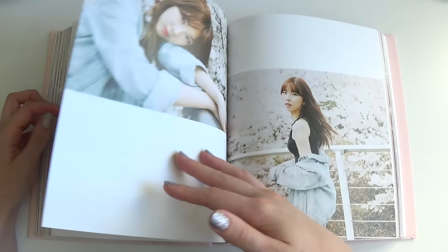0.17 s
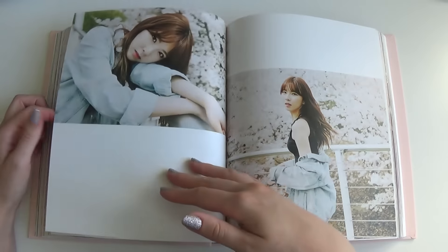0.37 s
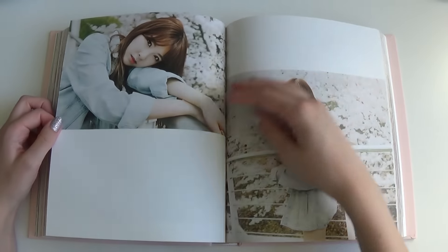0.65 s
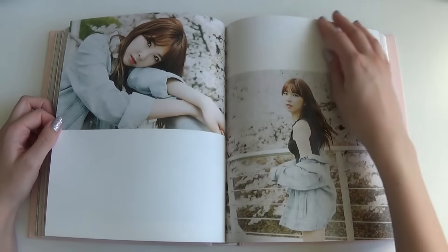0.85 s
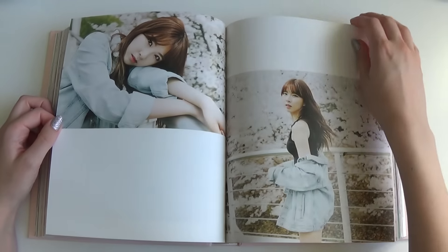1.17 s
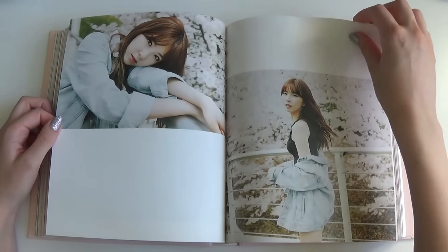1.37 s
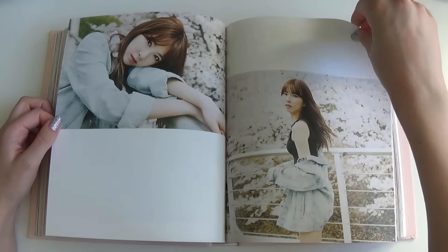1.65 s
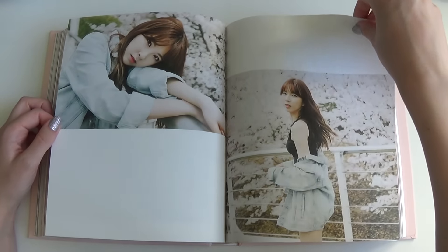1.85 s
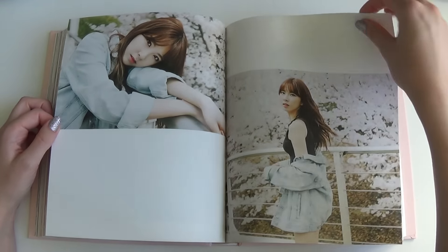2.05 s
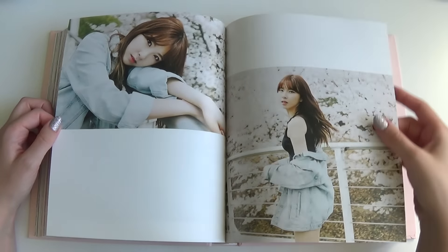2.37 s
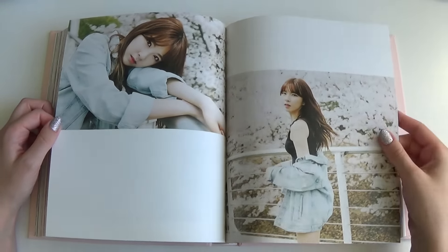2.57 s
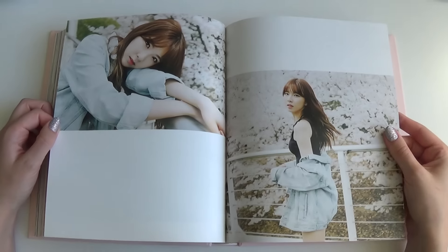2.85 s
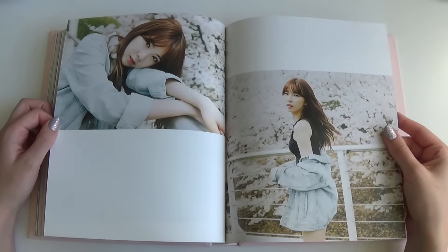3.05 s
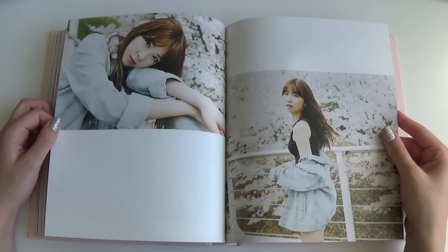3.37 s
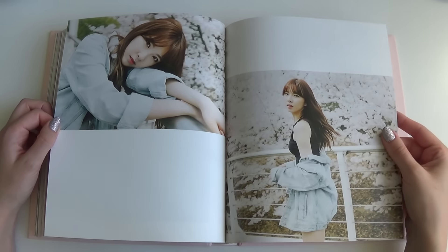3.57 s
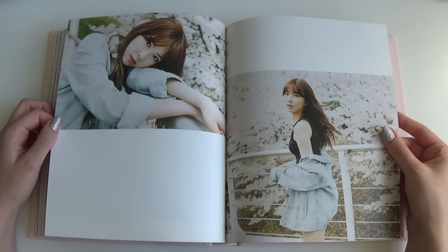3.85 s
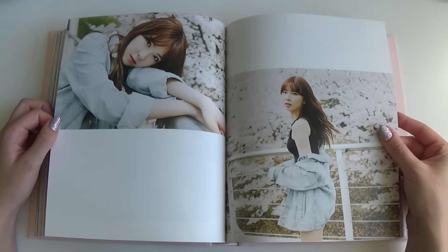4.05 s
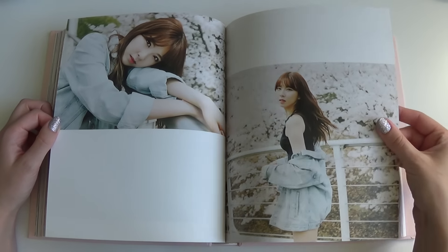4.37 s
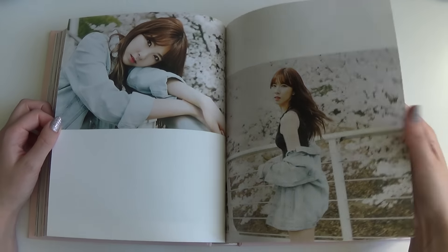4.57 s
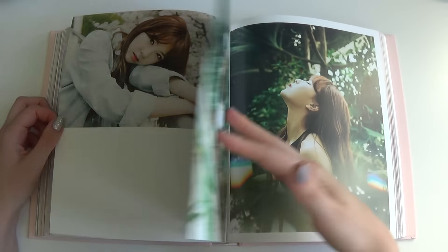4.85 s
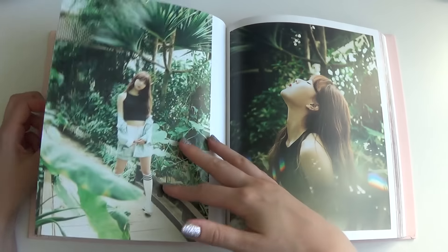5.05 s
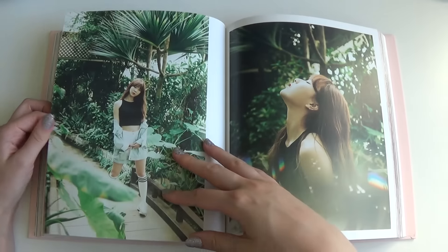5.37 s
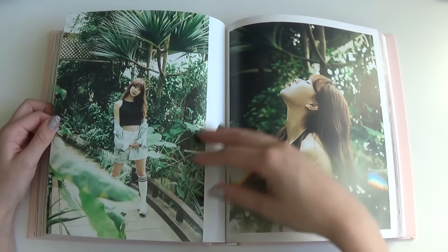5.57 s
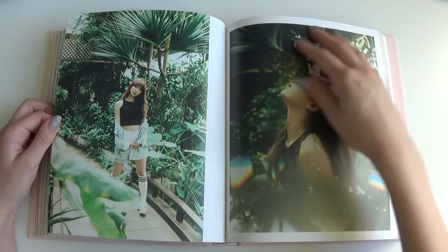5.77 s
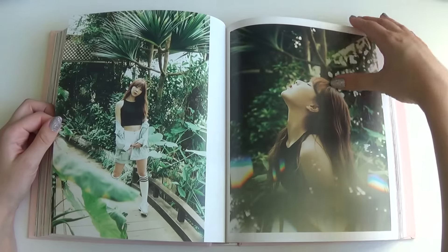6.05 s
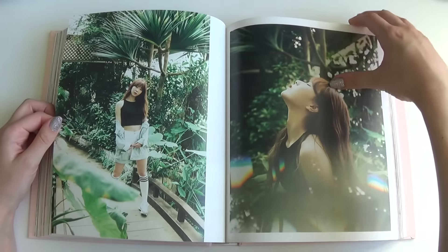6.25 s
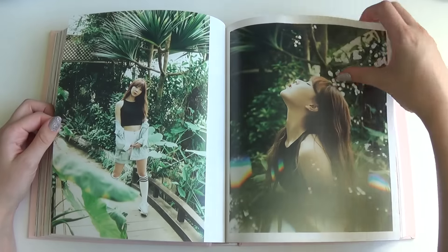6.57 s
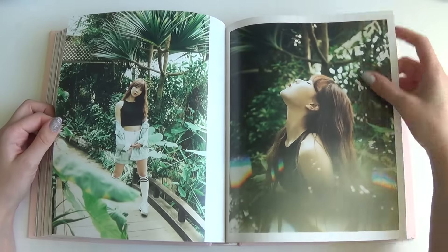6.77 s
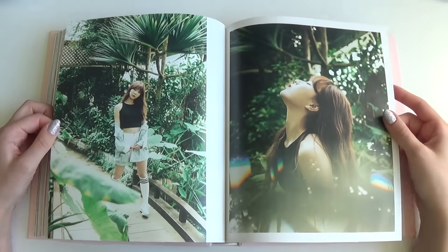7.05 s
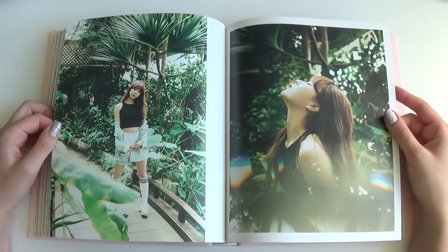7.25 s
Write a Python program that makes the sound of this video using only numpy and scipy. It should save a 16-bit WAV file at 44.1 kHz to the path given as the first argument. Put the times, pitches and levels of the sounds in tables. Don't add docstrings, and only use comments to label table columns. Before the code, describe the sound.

Close stereo pickup of a large glossy book in a quiet, barely reverberant room. A steady soft hiss with low rumble, a faint very high whine and tiny rapid lens-motor ticks continue throughout. From 0 to 1.2 s a palm slides over coated paper in silky, high airy strokes, strongest near 0.75. At 1.4 to 2.5 s fingers and nails scrape the page edge, brighter and rougher, with whistling friction, creaks and a hard pop at 2.0. It calms from 2.7, with sparse fibre ticks; at 3.66 to 4.0 a thumb makes a fine dry crackle. Sharp snaps burst at 4.18 to 4.41, then creaks and pops near 4.55 as the sheet turns with a rustle, settling around 5.0 with small clicks. Smooth strokes and a dull slap come at 5.5 to 6.0. A sharp click, rasp and low slap peak at 6.7, fading into light rubbing and small taps until 7.4.

```python
import sys
import numpy as np
from scipy import signal
from scipy.fft import rfft, irfft, next_fast_len
from scipy.io import wavfile
from scipy.ndimage import uniform_filter1d, map_coordinates

SR = 44100
rng = np.random.default_rng(int(sys.argv[2]) if len(sys.argv) > 2 else 0)


def ratio_of_db(decibels):
    return 10 ** (np.asarray(decibels, float) / 20)


def output_pcm(signal):
    pcm = np.clip(np.atleast_2d(signal).T, -1, 1) * 32767
    wavfile.write(sys.argv[1], SR, np.round(pcm).astype(np.int16))


N = 326937

# peak_s, level_db, swell_s, fade_s
HAND_GLIDES = [
    (0, -55, 0.011, 0.17),
    (.65, -50, 0.23, 0.23),
    (.75, -45.5, 0.06, 0.13),
    (.855, -50, .08, 0.22),
    (1.0, -53.5, 0.56, 0.11),
    (4.805, -51.5, 0.0043, .4),
    (4.95, -47, 0.12, 0.11),
    (5.778, -45, 0.21, 0.22),
    (6.0, -57, .3, 0.082),
]
# peak_s, level_db, swell_s, fade_s
FINGER_BRUSHES = [(.31, -60, 0.24, 0.056), (.568, -48, 0.045, 0.061), (1.705, -55, .005, 0.07),
                  (2.265, -49, 0.18, 0.022), (2.326, -46.5, 0.0031, 0.12), (2.44, -49, 0.13, 0.058),
                  (2.695, -52, .03, .03), (4.7, -54.5, 0.24, 0.061), (5.209, -56.5, 0.34, 0.13),
                  (5.59, -53, 0.13, .06), (6.296, -50.5, .004, 0.013), (6.551, -52.5, .005, 0.24),
                  (6.87, -45.5, 0.31, 0.2), (7.117, -53.5, 0.004, 0.057), (7.223, -52.5, 0.0044, 0.027),
                  (7.249, -54, .004, .02), (2.402, -51, .004, .1), (4.602, -54, .004, 0.18),
                  (5.482, -53, .006, .01), (6.63, -51, .006, .2), (6.695, -42, .01, .1)]
# peak_s, level_db, swell_s, fade_s
NAIL_SCRAPES = [(.31, -56, 0.28, 0.073), (1.142, -53.5, 0.069, 0.22), (1.47, -48.5, 0.062, 0.041),
                (1.748, -34, 0.015, 0.079), (1.9, -45, 0.17, .08), (1.987, -52, 0.009, 0.11),
                (2.075, -42, 0.0064, 0.19), (2.18, -35, 0.11, 0.02), (2.2, -46.5, .02, .1),
                (2.44, -45, 0.056, 0.19), (2.695, -47.5, 0.047, 0.046), (4.42, -57, .01, 0.079),
                (4.487, -52, 0.0051, 0.31), (4.992, -48, 0.12, 0.08), (5.476, -57.5, .02, 0.26),
                (6.59, -43, 0.046, 0.024), (6.707, -43.5, 0.15, 0.33), (7.03, -46.5, 0.51, 0.071)]
# peak_s, level_db, swell_s, fade_s
EDGE_DRAGS = [(.124, -58.5, 0.5, 0.84), (.55, -61, .25, 0.17), (1.0, -51.5, 0.73, 0.25),
              (1.2, -59, 0.6, 0.81), (1.433, -47, 0.005, 0.11), (1.766, -34, 0.035, 0.19),
              (1.89, -37, 0.17, 0.093), (1.987, -37.5, 0.0089, 0.047), (2.18, -40.5, 0.12, 0.03),
              (2.326, -51.5, .005, 0.099), (2.44, -50, 0.035, 0.18), (2.695, -49.5, 0.14, 0.05),
              (2.76, -57.5, .1, 0.54), (3.475, -62, .005, .16), (3.75, -62.5, 0.12, 0.97),
              (4.042, -57, .005, 0.17), (4.551, -49.5, 0.22, 0.29), (4.7, -53, 0.27, 0.026),
              (4.803, -53, 0.0045, 0.17), (4.999, -49.5, 0.086, 0.092), (5.209, -50.5, 0.43, 0.15),
              (5.48, -60.5, .02, 0.57), (5.778, -56, 0.18, 0.58), (6.523, -50, .004, .1),
              (6.551, -45.5, 0.01, 0.2), (6.585, -43, .006, .04), (6.635, -47, .01, .2),
              (6.707, -38.5, 0.059, 0.18), (7.06, -48, 0.61, 0.11)]
# skin_db, gloss_db, nail_db, edge_db
STROKE_MIX = [(0, -2.5, -8, -12), (-0.5, -7.5, -10, -19), (-4.5, -17, -0.5, -5), (-17.5, -28, -21, -1)]
# peak_s, level_db, swell_s, fade_s, resonance_hz
BENDS = [(.3, -59.5, 0.27, 0.53, 1480), (.55, -61.5, 0.27, 0.25, 1500), (1.429, -51.5, .006, 0.11, 1150),
         (1.704, -48.5, .004, 0.056, 1500), (1.89, -47, 0.21, 0.19, 1780), (2.036, -39, .015, 0.035, 900),
         (2.11, -47, .1, .1, 1750), (2.165, -41, 0.04, 0.06, 1550), (2.22, -49, .05, 0.11, 1450),
         (2.4, -56, .01, .08, 1050), (2.328, -50, 0.004, 0.13, 1010), (2.45, -47.5, 0.047, 0.3, 1290),
         (2.75, -59, 0.41, 0.16, 1200), (3.482, -67.5, .02, .6, 1130), (3.796, -68, 0.25, 1.2, 1320),
         (4.06, -63, .5, .3, 1440), (4.51, -46, .06, .1, 1150), (4.553, -41.5, 0.03, 0.05, 1030),
         (4.595, -43, .05, .08, 1020), (4.803, -61, 0.0017, 0.12, 864), (4.979, -55, 0.089, 1, 1470),
         (5.26, -53.5, 0.63, 0.035, 1330), (5.582, -56.5, 0.17, 0.06, 1200), (5.88, -66, 0.34, 1, 970),
         (6.7, -48, 0.24, .05, 884), (6.725, -46.5, .02, 0.17, 744), (7.06, -51.5, 0.26, 0.16, 1700)]
# peak_s, level_db, swell_s, fade_s
AIR_PUSHES = [(0, -61, .01, 0.12), (.726, -62, 0.16, 0.33), (2.036, -39.5, 0.015, 0.08),
              (2.27, -53, 0.073, 0.12), (.3, -63.5, 0.11, 0.11), (4.185, -51, .01, .06),
              (4.265, -50, .01, 0.074), (2.756, -60.5, 0.28, 0.33), (3.796, -56.5, 0.21, 0.46),
              (4.558, -51, 0.26, 0.18), (4.803, -52.5, .005, 0.26), (5.269, -61, 0.71, 0.074),
              (5.582, -55.5, 0.18, 0.066), (5.88, -58.5, 0.34, 0.28), (6.6, -56, 0.17, 0.19),
              (6.723, -40, 0.008, 0.06), (4.85, -54, .06, .12), (6.56, -54, .02, .08)]
# peak_s, level_db, swell_s, fade_s, pitch_hz
AIR_WHISTLES = [(.567, -44, .015, .012, 6200), (.755, -57, .04, .08, 5700), (.76, -55, 0.056, 0.27, 3050),
                (.86, -49, 0.22, .2, 11600), (.87, -56, 0.11, 0.089, 4700), (1.03, -56, 0.26, .08, 3100),
                (1.79, -45, 0.054, .08, 3170), (1.88, -39.5, .15, 0.13, 2340), (1.87, -50, .1, .12, 7100),
                (1.87, -50, .1, .1, 4150), (2.01, -47, .03, .05, 5100), (2.09, -40, .03, 0.094, 5000),
                (2.41, -51, .012, .08, 6700), (4.59, -55, .12, .015, 8400), (4.19, -54, .006, .08, 5300),
                (4.27, -50, .006, .08, 5000), (4.41, -52, .012, .07, 5200), (2.13, -46, .08, .06, 4200),
                (2.165, -47, .04, .03, 5200), (1.765, -45, .02, .06, 6500), (4.99, -45, .015, .025, 4300),
                (5.125, -50, .03, .06, 1450), (.16, -59, .1, .06, 3100), (6.59, -45, .012, .012, 2500),
                (5.78, -44, .1, .12, 12200), (5.95, -58, .15, .15, 11200), (6.56, -52, 0.044, .06, 1880),
                (6.93, -47, .12, .1, 4960), (6.93, -53, .15, 0.18, 3150), (7.03, -47, .1, .08, 4900),
                (7.06, -52, .08, 0.072, 2000)]
STROKE_DB = 20
ROUND_SKIN, ROUND_PAPER, ROUND_BEND = 1.33, 1.226, 1.15

# start_s, peak_db, ring_hz, crack_db
SNAPS = [(1.703, -41, 1420, -15), (2.034, -32, 950, -25), (4.1772, -36, 1300, -12), (3.242, -47.5, 940, 7),
         (3.927, -45, 1050, 4), (4.044, -36.5, 1320, -3), (4.184, -23.5, 1310, -2),
         (4.263, -14, 1240, -6.5), (4.358, -34, 1080, -12), (4.366, -15, 1130, -8),
         (4.398, -19, 1270, -8.5), (4.408, -24.5, 1370, -6.5), (5.587, -34.5, 1380, 1.5),
         (7.117, -40, 1480, -1)]
# start_s, peak_db, ring_hz, crack_db
POPS = [(.408, -37, 1400, -14), (1.984, -13.5, 2660, -39), (2.071, -21.5, 4100, -26),
        (2.326, -34.5, 990, -17), (4.549, -19.5, 984, -15.5), (4.578, -28, 1160, -24),
        (4.601, -26.5, 990, -7), (4.802, -46, 980, 7), (4.985, -27, 1670, -10), (4.992, -26, 1390, -8),
        (6.654, -34, 2360, 3), (6.733, -27, 700, -20), (6.761, -35, 780, -20), (6.78, -37, 740, -20)]
# start_s, peak_db, ring_hz, crack_db
SLAPS = [
    (5.563, -36, 1270, -1.5),
    (6.295, -42.5, 800, 0),
    (6.551, -37, 1820, 0),
    (6.74, -30, 780, -12),
    (7.223, -41.5, 2500, -1.5),
]
# start_s, peak_db, ring_hz, crack_db
SLIPS = [(5.9, -34, 4600, -4), (6.7108, -16, 2180, -16), (7.2477, -42.5, 2500, 3.5), (4.9, -36, 1900, 3),
         (7.231, -45, 700, -8), (6.719, -13, 740, -6), (6.7195, -22, 3200, -30), (5.2, -28, 2500, 3),
         (.184, -44, 2600, -6), (6.584, -34, 5500, 0), (1.985, -23, 2000, -30), (3.679, -41, 1700, 0),
         (4, -36.5, 1900, -5), (4.018, -38, 1800, -5), (3.909, -36, 1700, -6)]
# thump_db, settle_s (time to fall 60 dB)
SETTLING = [(-19, 0.12), (-36, 0.15), (-13, 0.15), (-41, 0.02)]
# start_s, peak_db
FIBRE_TICKS = [(0.323, -38), (1.163, -40), (1.686, -38), (2.843, -39), (3.063, -43), (3.099, -42),
               (3.475, -41), (3.491, -41), (3.507, -40), (3.521, -41), (3.526, -41), (3.579, -40),
               (3.564, -43), (3.641, -40), (3.968, -35.5), (4.873, -33), (5.171, -38), (5.411, -39),
               (5.481, -38), (5.525, -35), (5.546, -35), (6.523, -39), (7.095, -37), (7.121, -38),
               (6.629, -36)]
# start_s, peak_db
THUMB_SLIPS = [(3.6613, -38), (3.697, -40), (3.7018, -34), (3.7088, -42), (3.7123, -39), (3.7215, -40),
               (3.7273, -36), (3.7338, -39), (3.7385, -37), (3.7494, -39), (3.7533, -37), (3.7693, -40),
               (3.7726, -34), (3.7888, -36), (3.7919, -33), (3.7954, -40), (3.8077, -33), (3.8132, -42),
               (3.8202, -38), (3.8234, -35), (3.8336, -43), (3.8405, -33), (3.8548, -32.5), (3.8632, -41),
               (3.8676, -36), (3.8764, -42), (3.8798, -34), (3.8915, -32), (3.8947, -41), (3.9166, -41),
               (3.9802, -37)]
BREAK_S = .0025
RING_SHARP, WHISTLE_SHARP = 3.66, 6.1

# pitch_hz, level_db
SKIN_COLOUR = [(200, -45), (4000, -15), (6000, -7.5), (8500, -3), (10200, 1), (11800, 1), (13500, -15),
               (15800, -20)]
# pitch_hz, level_db
GLOSS_COLOUR = [(200, -45), (9000, -18), (11500, -4), (13000, 0.5), (15000, -6), (15850, -6)]
# pitch_hz, level_db
NAIL_COLOUR = [(2800, -30), (3900, -9), (4500, -6), (5000, 0), (5600, -5), (7200, -9), (9000, -22),
               (15000, -45)]
# pitch_hz, level_db
EDGE_COLOUR = [(150, -55), (1000, -20.5), (1900, -4.5), (2400, -3), (3100, -2), (3800, -4.5), (6000, -14.5),
               (15000, -35)]
# pitch_hz, level_db
SHEET_COLOUR = [(350, -40), (600, -24), (900, -14), (1700, -14), (2300, -26), (4000, -46)]
# pitch_hz, level_db
AIR_COLOUR = [(40, -60), (90, -25), (170, 0), (350, -3), (600, 2), (1000, -18), (2000, -51)]
# pitch_hz, level_db
CRACK_COLOUR = [(300, -29.5), (800, -1), (1500, -1.5), (3000, -2), (4700, -1), (7500, -15), (11500, -10),
                (16000, -34.5)]
# pitch_hz, level_db
FIBRE_COLOUR = [(300, -27), (800, -1), (1600, 2.5), (3000, -4), (4500, -9), (7000, -16.5), (14000, -20.5)]

# first_step_s, last_step_s, level_db
FOCUS_RUNS = [
    (0.036, .75, -54),
    (0.757, 1.65, -51.5),
    (1.6775, 3.34, -52),
    (3.394, 4.4, -56.5),
    (4.4375, 5.5, -47.5),
    (5.5175, 7.41, -50),
]
# pitch_hz, level_db, decay_s (time to fall 60 dB)
LENS_RINGS = [(2440, -1, 0.039), (2670, 7, 0.016), (3150, -8, .007)]
# pitch_hz, level_db (per Hz)
HISS_COLOUR = [(20, -25), (40, 0), (70, -3), (98, 8.5), (125, -1), (200, 1.5), (300, -4), (500, -3),
               (1000, -5), (2000, -7.5), (4000, -10.5), (8000, -13), (12500, -15.5), (15300, -16.5)]
# pitch_hz, likeness (1 = the same)
HISS_LIKENESS = [(60, 0.82), (180, 0.94), (550, 0.33), (1650, 0.15), (4970, 0.69), (15000, 0.87)]
# pitch_hz, decay_s (time to fall 60 dB)
ROOM_DECAY = [(200, 0.19), (1000, 0.22), (4000, 0.13), (12000, 0.058)]
# time_s, left_minus_right_db
HAND_PLACE = [(0.0, 0), (1.86, -2), (2.97, -1), (4.722, -1.5), (4.87, -0.5), (5.22, 0.5), (6.69, -2),
              (7.41, -0.5)]
# pitch_hz, lead_radians
PORT_LEAD = [(0, 0), (340, 0.25), (1120, 0.55), (2410, 0.55), (4130, 0.33), (4480, 0.13), (6460, 0.39),
             (16500, 0.33)]
# pitch_hz, left_minus_right_db
PORT_LEAN = [(40, 2), (250, 5.5), (1000, 4), (2500, 1), (12000, 0.5)]
# pitch_hz, side_db
PORT_WIDTH = [(30, -10), (150, 0.5), (1000, 1.5), (5000, 0.5), (10000, -3.5), (14000, -5.5)]


def rubbing():
    kinds = [(HAND_GLIDES, ROUND_SKIN), (FINGER_BRUSHES, ROUND_SKIN),
             (NAIL_SCRAPES, ROUND_PAPER), (EDGE_DRAGS, ROUND_PAPER)]
    effort = [swells(rows, roundness).sum(0) for rows, roundness in kinds]
    powers = ratio_of_db(STROKE_MIX).T ** 2 @ effort
    skin, gloss, nail, edge = (sampled(np.sqrt(power)) for power in powers)
    skin = skin * friction(SKIN_COLOUR, grit_db=.8, patchy_db=1.3)
    gloss = gloss * friction(GLOSS_COLOUR, grit_db=.3, patchy_db=1.2)
    nail = nail * friction(NAIL_COLOUR, grit_db=1.5, patchy_db=3.5)
    edge = edge * friction(EDGE_COLOUR, grit_db=1.87, patchy_db=2.0)
    return skin + gloss + nail + edge


def creaks():
    bends = swells(BENDS, ROUND_BEND) + 1e-30
    sheet_hz = sampled(np.transpose(BENDS)[4] @ bends / bends.sum(0))
    rough = friction(SHEET_COLOUR, grit_db=2.5, patchy_db=0.0, centre_hz=sheet_hz, lift_db=7.5, width=.13)
    return sampled(np.sqrt(bends.sum(0))) * rough


def air_pushes():
    push = sampled(np.sqrt(swells(AIR_PUSHES, ROUND_BEND).sum(0)))
    return push * friction(AIR_COLOUR, grit_db=3.0, patchy_db=-3.0)


def snaps():
    out, t = np.zeros(N + SR), np.arange(SR // 6) / SR
    click = causal(CRACK_COLOUR)
    at_break = round(BREAK_S * SR)
    impulse = np.zeros(len(t))
    impulse[at_break] = 1
    blow = np.where(t < BREAK_S, ratio_of_db(-22 * (1 - t / BREAK_S)), ratio_of_db(-60 * (t - BREAK_S) / 0.0036))
    for table, (thump_db, settle_s) in zip([SNAPS, POPS, SLAPS, SLIPS], SETTLING):
        settle = ratio_of_db(-60 * t / settle_s) * (t > BREAK_S)
        for start_s, peak_db, ring_hz, crack_db in table:
            jolt, shake, puff = rng.standard_normal((3, len(t)))
            jolt[at_break] = -3.5
            clean_ring = ringing(ringing(impulse, ring_hz, RING_SHARP), ring_hz, 1.2)
            shaking = shake * (blow + ratio_of_db(-7) * settle)
            rough_ring = ringing(ringing(shaking, ring_hz, RING_SHARP), ring_hz, RING_SHARP)
            ring = ratio_of_db(-6.5) * rough_ring - clean_ring
            crack = signal.fftconvolve(jolt * (blow + ratio_of_db(-6.5) * settle ** 1.35), click)[:len(t)]
            crack = crack / np.abs(crack).max()
            thump = ringing(ringing(puff * settle, 120, 0.48), 615, 1.0)
            snap = 0.66 * ring + ratio_of_db(crack_db + 2.0) * crack + ratio_of_db(thump_db + 5.5) * thump
            out[round((start_s - .002) * SR):][:len(t)] += ratio_of_db(peak_db) * snap
    return out[:N]


def ticks():
    out, t = np.zeros(N), np.arange(200) / SR
    for start_s, peak_db in [*FIBRE_TICKS, *THUMB_SLIPS]:
        burst = 0.2 * rng.standard_normal(len(t)) * ratio_of_db(-60 * t / 0.012)
        burst[0] = 1
        out[round(start_s * SR):][:len(t)] += ratio_of_db(peak_db - 3.5) * burst
    return signal.fftconvolve(out, causal(FIBRE_COLOUR))[:N]


def air_whistles():
    slips = rng.standard_normal(N) * ratio_of_db(1.5 * (wobble(900) + wobble(90)))
    out = np.zeros(N)
    for k, (power, row) in enumerate(zip(swells(AIR_WHISTLES, ROUND_PAPER), AIR_WHISTLES)):
        pitch_hz = row[4]
        own_slips = np.roll(slips, 9001 * k)
        tone = ringing(ringing(own_slips, pitch_hz, WHISTLE_SHARP), pitch_hz, WHISTLE_SHARP)
        out += sampled(np.sqrt(power)) * unit(tone)
    return out


def focus_motor():
    steps_per_s = 25
    out, t = np.zeros(N + SR), np.arange(SR // steps_per_s) / SR
    onset = 1 - np.exp(-(t / 0.0017) ** 2)
    chance = rng.standard_normal((200, 3, 2))
    for first_s, last_s, run_db in FOCUS_RUNS:
        for k, step_s in enumerate(np.arange(first_s, last_s, 1 / steps_per_s)):
            for j, (pitch_hz, level_db, decay_s) in enumerate(LENS_RINGS):
                louder, higher = chance[int(step_s * steps_per_s + .5), j]
                step_db = level_db + 1.1 * louder + 0.89 * (j > 0) * (-1) ** k
                tone = np.sin(2 * np.pi * pitch_hz * (1 + 0.0068 * higher) * t)
                ring = ratio_of_db(step_db - 60 * t / decay_s) * tone
                out[round(step_s * SR):][:len(t)] += ratio_of_db(run_db) * ring * onset
    return out[:N] * sides(6.1)[:, None]


def room(x):
    hz, t, z = signal.stft(rng.standard_normal((2, SR // 3)), SR, nperseg=256)
    fading = z * ratio_of_db(-60 * t / along(ROOM_DECAY, hz)[:, None])
    a, b = signal.istft(fading, SR, nperseg=256)[1]
    tail = np.array([a + 0.58 * b, a - 0.48 * b]) / np.linalg.norm(a)
    late = np.pad(x, ((0, 0), (150, 0)))
    return signal.fftconvolve(late, tail, axes=1)[:, :N]


def hiss():
    def colour(hz):
        turn = np.arccos(np.clip(along(HISS_LIKENESS, hz), -1, 1)) / 2
        return ratio_of_db(along(HISS_COLOUR, hz)) * [np.cos(turn), np.sin(turn)]

    mid, side = filtered(rng.standard_normal((2, N)), colour)
    return ratio_of_db(-58 + 0.45 * wobble(1.63)) * unit(np.array([mid + side, mid - side]))


def camera_whistle():
    t = np.arange(N) / SR
    beat = 1 + 0.44 * np.cos(2 * np.pi * 50 * t) + 0.22 * wobble(60)
    return ratio_of_db(-64.0) * beat * np.sin(2 * np.pi * 15625 * t)


def friction(colour, grit_db, patchy_db, centre_hz=None, lift_db=0, width=.2):
    slips = rng.standard_normal(N) * ratio_of_db(grit_db * np.clip(wobble(900) + wobble(120), -4, 2.4))
    hz, t, z = signal.stft(slips, SR, nperseg=256)
    patches = uniform_filter1d(rng.standard_normal(z.shape), size=3, axis=0)
    patches = uniform_filter1d(patches, size=14, axis=1)
    gain = ratio_of_db(along(colour, hz)[:, None] + patchy_db * unit(patches))
    if centre_hz is not None:
        off = np.log((hz[:, None] + 1) / np.interp(t, np.arange(N) / SR, centre_hz))
        gain = gain * ratio_of_db(lift_db * np.exp(-.5 * (off / width) ** 2))
    gain = gain / np.sqrt(np.mean(gain ** 2, axis=0))
    return unit(signal.istft(z * gain, SR, nperseg=256)[1][:N])


def swells(rows, roundness):
    peak_s, level_db, swell_s, fade_s = np.transpose(rows)[:4, :, None]
    late = np.arange(0, N / SR, 1 / 2000) - peak_s
    distance = np.where(late < 0, -late / swell_s, late / fade_s)
    return ratio_of_db(level_db - STROKE_DB * distance ** roundness) ** 2


def ringing(burst, hz, sharp):
    r = np.exp(-np.pi * hz / sharp / SR)
    y = signal.lfilter([1, 0, -1], [1, -2 * r * np.cos(2 * np.pi * hz / SR), r * r], burst)
    return y / np.abs(y).max()


def causal(colour, size=1024):
    c = irfft(np.log(ratio_of_db(along(colour, np.fft.rfftfreq(size, 1 / SR)))))
    c[1:size // 2] *= 2
    c[size // 2 + 1:] = 0
    h = irfft(np.exp(rfft(c)))
    return h / np.abs(h).max()


def filtered(x, response):
    m = next_fast_len(N + SR // 2)
    return irfft(rfft(x, m) * response(np.fft.rfftfreq(m, 1 / SR)), m)[..., :N]


def wobble(rate):
    points = rng.standard_normal(int(N * rate / SR) + 4)
    return map_coordinates(points, [np.arange(N) * rate / SR], order=1)


def sampled(slow):
    return np.interp(np.linspace(0, len(slow), N), np.arange(len(slow)), slow)


def along(points, hz):
    f, v = np.transpose(points)
    return np.interp(np.log(hz + 1), np.log(f + 1), v)


def sides(pan_db):
    return ratio_of_db(np.multiply.outer([.5, -.5], pan_db))


def unit(x):
    return x / np.sqrt(np.mean(x ** 2) + 1e-20)


def scene():
    book = rubbing() + creaks() + air_pushes() + snaps() + ticks() + air_whistles()
    book = book * sides(np.interp(np.arange(N) / SR, *np.transpose(HAND_PLACE)))

    def ports(hz):
        lead = np.multiply.outer([.5, -.5], along(PORT_LEAD, hz))
        return sides(along(PORT_LEAN, hz)) * np.exp(1j * lead)

    direct = filtered(book, ports)
    return direct + ratio_of_db(-11) * room(book) + focus_motor() + hiss() + camera_whistle()


def low_pass(x):
    return signal.sosfilt(signal.butter(12, 16950, fs=SR, output="sos"), x)


def record(dry):
    top_hz = 15880
    mid = filtered((dry[0] + dry[1]) / 2, lambda hz: hz < top_hz)
    side = filtered((dry[0] - dry[1]) / 2, lambda hz: ratio_of_db(along(PORT_WIDTH, hz)) * (hz < top_hz))
    return low_pass(np.array([mid + side, mid - side]))


dry = scene()
out = record(dry)
output_pcm(out)
```